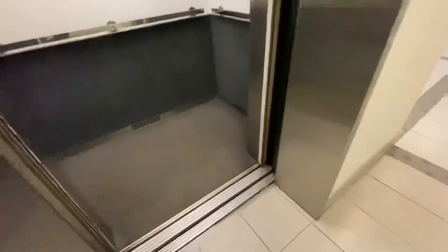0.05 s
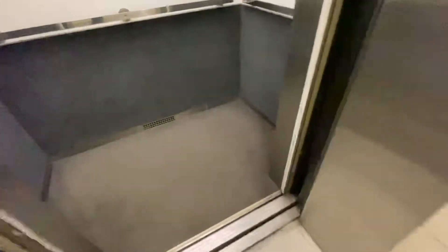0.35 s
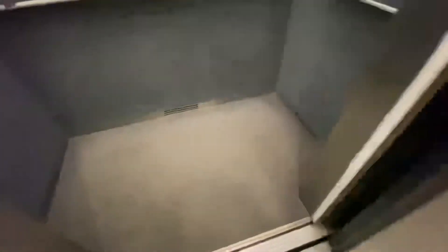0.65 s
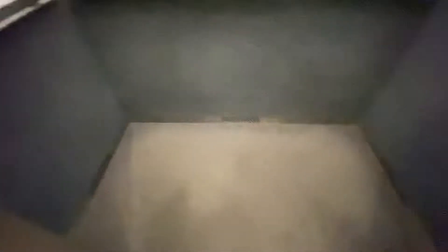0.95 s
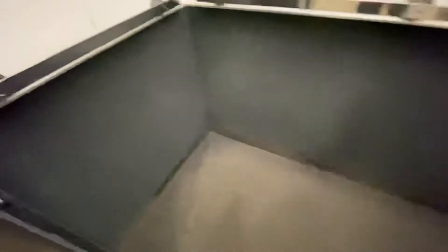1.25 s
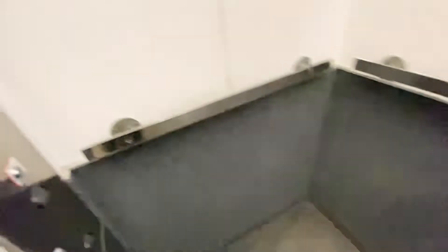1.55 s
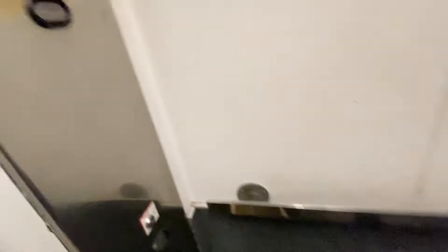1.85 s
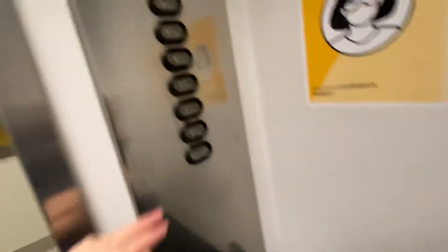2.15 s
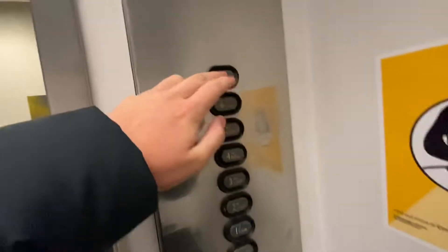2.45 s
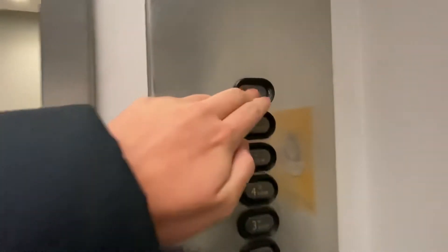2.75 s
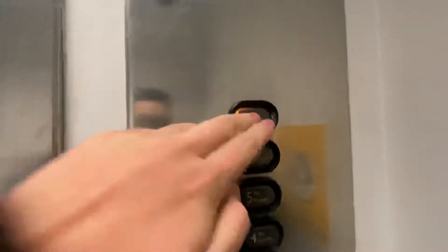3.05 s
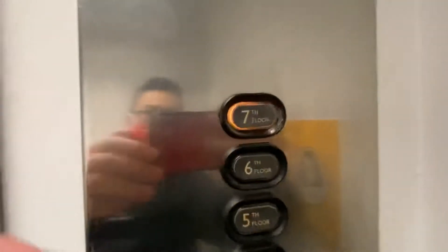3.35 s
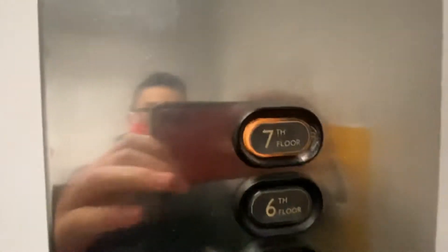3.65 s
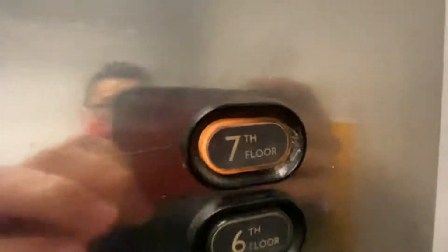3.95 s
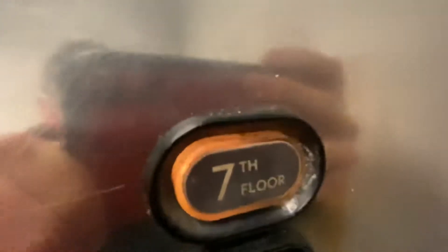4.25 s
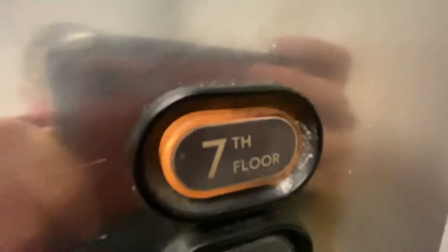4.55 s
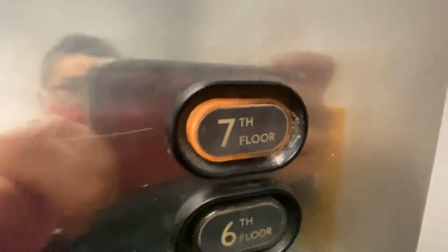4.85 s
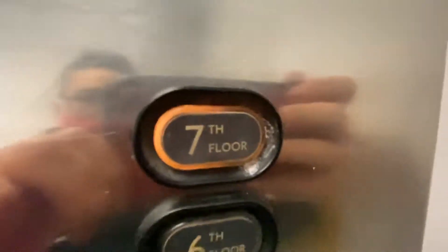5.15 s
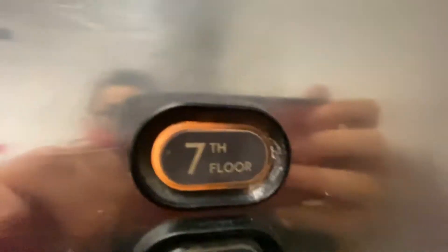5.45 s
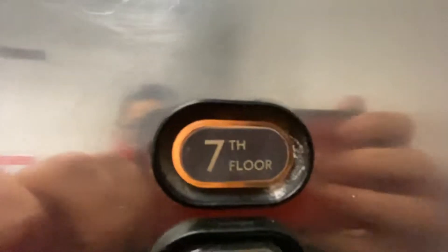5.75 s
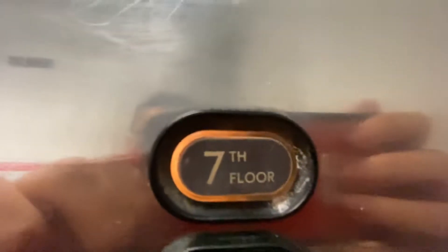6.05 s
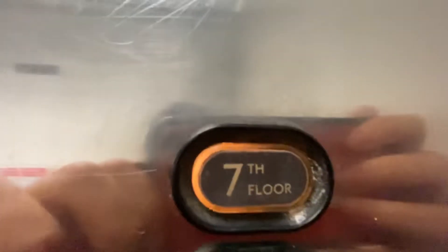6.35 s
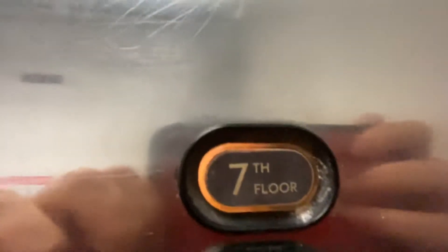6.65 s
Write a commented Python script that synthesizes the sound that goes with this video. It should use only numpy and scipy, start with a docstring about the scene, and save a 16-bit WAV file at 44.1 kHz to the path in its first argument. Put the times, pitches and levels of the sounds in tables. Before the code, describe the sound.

Footsteps enter a humming elevator, a button clicks twice, and steel doors rumble, clack and squeak shut with a heavy thud.

```python
"""Old steel lift doors closing

Someone steps into the hollow car over a machinery drone, coat rustling, and clicks a floor button twice.
The doors slide: their sheet steel rumbles and knocks, a dry roller chirps, hangers clack along the track
and a guide shoe squeals as they brake. The leaves latch and meet with a heavy thud; the drone remains.
Hits are decaying noise and ringing modes, squeaks are jittery friction tones, the rumble is shaped noise."""
import sys
import numpy as np
from scipy import signal
from scipy.fft import rfft, irfft, next_fast_len
from scipy.io import wavfile
from scipy.ndimage import map_coordinates

SR = 44100
rng = np.random.default_rng(int(sys.argv[2]) if len(sys.argv) > 2 else 0)


def materialize(psi):
    """Save the field psi as 16-bit PCM at rate SR to the path in sys.argv[1].

    A 1-D psi becomes a single channel; in a 2-D psi each row is a channel.
    """
    bounded = np.clip(np.atleast_2d(psi).T, -1, 1)
    quanta = np.round(bounded * 32767).astype(np.int16)
    wavfile.write(sys.argv[1], SR, quanta)


N = 300321
TIME = np.arange(N) / SR
AGE = TIME[:SR * 3 // 4]  # seconds since a hit
DOOR_LEAD_S = 0.000441  # the doors reach the left channel first

# Stereo width: f/Hz, left-right likeness
LIKENESS = [(60, 0.93), (300, 0.87), (550, 0.25), (2000, 0.064), (7000, 0.12), (12000, 0.091)]
# Keeps the bass centred: f/Hz, share of the stereo lead and of the wall reflections
SPREAD = [(450, 0.011), (620, 0.93)]
# Balance of the sliding doors: f/Hz, left minus right/dB
DOOR_PAN = [(60, -1), (200, -1), (380, -3.5), (800, 4.5), (1500, 0.5), (2400, -1.5), (4400, 1.5), (7500, 2),
            (10000, -7), (15000, 2.5)]
# Echo of the steel car: f/Hz, t60/s
CAR_DECAY = [(100, 0.26), (1000, 0.098), (5000, 0.17), (12000, 0.12)]

# Machinery in the shaft and moving air, fader curves: t/s, level/dB
DRONE_LEVEL = [(0.08, -44), (0.55, -53), (1.2, -68), (1.5, -43.5), (2.23, -50), (2.5, -40.5), (3.05, -41.5),
               (6.3, -34.5), (6.8, -37.5)]
DRAUGHT_LEVEL = [(0.02, -46), (0.2, -53.5), (0.45, -49.5), (0.95, -50), (1.15, -53), (1.5, -45.5),
                 (1.82, -50.5), (2.15, -47), (2.95, -49), (6.5, -47)]
# Their noise colours: f/Hz, level/dB
DRONE_EQ = [(17, -37), (33, 1.5), (54, 5.5), (102, 7.5), (117, 9.5), (135, -37), (170, -16), (220, -37),
            (370, -120)]
DRAUGHT_EQ = [(76, 4), (125, 2.5), (190, -7.5), (492, -19.5), (588, -7.5), (3000, -19.5), (5550, -27.5),
              (7050, -27.5), (10900, -38), (12100, -46), (13100, -75), (15000, -53)]
# A low hum that sags, then swells and rises: t/s, f/Hz, level/dB
MOTOR_HUM = [(0.0, 53.3, -61), (0.45, 47.5, -58), (0.6, 43.7, -66), (0.95, 45.3, -50), (1.3, 46.9, -43.5),
             (1.62, 51.2, -47), (1.82, 55, -42), (1.95, 55.9, -44)]

# Coat swishes: peak t/s, level/dB, half length/s
SWISHES = [(0.54, -54.5, 0.097), (0.923, -56, 0.02), (1.265, -59.5, 0.2), (1.458, -54.5, 0.022),
           (2.023, -53.5, 0.093), (2.252, -54.5, 0.12), (6.494, -53.5, 0.086), (6.685, -58, 0.18)]
# Shoes and hand bump the car: t/s, thump/dB, ring f/Hz, scuff/dB, scuff t60/s
STEPS = [(0.36, -52, 335, -47.5, 0.76), (0.915, -60, 172.5, -48, 0.23), (0.987, -46, 126, -55, 0.11),
         (1.32, -45.5, 352, -54, 0.4), (1.441, -29.5, 247, -62, 0.15), (1.54, -40.5, 252, -57, .25),
         (1.913, -39.5, 97.7, -54, 0.062), (2.372, -33, 214, -61, .1), (2.403, -30.5, 156.3, -57, 0.067),
         (2.511, -30, 181, -44.5, 0.061), (2.565, -32.5, 125, -55, 0.42), (6.44, -41.5, 535, -47.5, 0.46)]
# Dry ticks of shoes, a finger on the panel and the door track: t/s, level/dB, centre f/Hz, t60/s
TICKS = [(0.827, -49, 1690, .04), (0.986, -44, 950, .05), (1.002, -41.5, 610, 0.1),
         (1.433, -40.5, 3350, .08), (2.403, -43, 1020, 0.12), (2.404, -42.5, 7600, 0.086),
         (2.421, -38, 590, .07), (3.418, -32, 1290, 0.018), (3.568, -28, 1050, 0.017),
         (3.592, -31, 1090, 0.016)]
# Colours of cloth, thump and scuff: f/Hz, level/dB
CLOTH_EQ = [(1000, -34), (3000, -4), (5500, -5), (7300, -0.5), (9500, -9), (12000, -13.5), (15000, -27)]
THUMP_EQ = [(40, -41), (100, 2), (250, 1.5), (450, -11), (1000, -21), (2000, -36), (5000, -129)]
SCUFF_EQ = [(200, -8), (900, 11.5), (2200, 8), (3300, 2.5), (4300, 0), (7000, -5), (10000, -14),
            (12000, -25), (15000, -40)]

# Button contacts, levels relative within each layer: t/s, click/dB, snap/dB, panel knock/dB
BUTTON_HITS = [(2.647, -27, -32, -44), (2.665, -20.5, -17, -32), (2.688, -46, -52, -25.5),
               (2.714, -42, -54, -24.5), (3.059, -30.5, -38, -47), (3.0727, -24.5, -8, -38)]
# Colours of the housing's click and the spring's snap: f/Hz, level/dB
CLICK_EQ = [(200, 9), (900, 12), (1800, 2), (2700, 2.5), (3800, -4.5), (5500, -4), (7200, 3), (9000, -7),
            (11300, -13), (13000, -24), (16000, -29)]
SNAP_EQ = [(500, -23), (2500, -1.5), (4400, -5), (7500, 0.5), (11000, 2.5), (13000, -11), (16000, -7)]
# Ring of the button panel: f/Hz, level/dB, t60/s
PANEL_MODES = [(109.6, 0.5, 0.42), (177, 1, 0.22), (209.6, 4.5, 0.37), (300, -7, 0.28), (410, -13, 0.21),
               (654, -14, 0.32), (708, -10, 0.23), (973, -0.5, .18), (998, -1.5, 0.16), (1430, -15, 0.18),
               (6940, -25, 0.6)]

# The doors creep, run, brake and ease shut; the end values hold as a faint rumble: t/s, share of full speed
DOOR_SPEED = [(3.05, 0.16), (3.12, 0.34), (3.5, 0.52), (3.75, 0.42), (4.099, 0.49), (4.3, 0.92), (4.75, 1),
              (5.17, 0.73), (5.441, 0.56), (5.57, 0.27), (5.8, 0.5), (6.1, 0.52), (6.2, 0.27), (6.6, 0.21)]
# The drive and its stops jolt the leaves: t/s, sway/dB, sheet/dB
JOLTS = [(3.08, -46, -33.5), (3.249, -27, -32.5), (3.432, -24, -24.5), (3.88, -41, -30), (4.22, -27.5, -34),
         (4.715, -22.5, -27.5), (4.97, -19, -28), (5.08, -21.5, -27.5), (5.37, -24.5, -27),
         (5.46, -25, -28), (5.71, -30, -25.5), (5.772, -39, -19.5), (5.87, -29, -23.5), (5.95, -23.5, -45),
         (6.01, -36, -23), (6.08, -33, -26), (6.24, -30.5, -52)]
# Colours of swaying leaves, drumming sheet, rollers and struck steel: f/Hz, level/dB
SWAY_EQ = [(12, -51), (20, -27.5), (86, -5.5), (170, -18), (220, -65), (370, -120)]
SHEET_EQ = [(71, -48), (120, 1.5), (285, -3.5), (471, -6.5), (549, -14.5), (696, -17), (891, -27.5),
            (1030, -24), (1400, -31), (1820, -40), (3080, -120)]
ROLLER_EQ = [(470, -15), (780, 0), (1090, -3), (1910, -7.5), (2630, -7), (3440, -11), (6680, -15.5),
             (9650, -22.5), (11200, -30), (12300, -36), (13100, -77), (14500, -38)]
STEEL_EQ = [(200, -2), (600, 0.5), (1200, -1.5), (2200, 2.5), (2900, 1), (3800, -5), (4800, -2),
            (5700, -10), (6900, -4.5), (8500, -14), (10300, -17.5), (12000, -28.5), (13000, -40),
            (15500, -34)]
# Hangers and latch strike: t/s, level/dB, rise/s, treble tilt/(dB per octave)
CLACKS = [(3.242, -40, 0.0015, -1.5), (3.443, -36.5, .004, 5), (3.467, -32, 0.0036, -2.5),
          (3.690, -36.5, .002, 4.5), (3.783, -36, 0.00098, -0.5), (3.855, -31.5, 0.0018, 1),
          (4.12, -38.5, 0.0098, 2), (4.203, -28, 0.0028, 0.5), (4.301, -29.5, 0.00086, 2),
          (4.366, -33, 0.0037, 6.5), (4.385, -29.5, 0.00095, 1.5), (4.446, -36.5, .002, 0.5),
          (4.474, -25, 0.0047, 0.5), (4.593, -21.5, 0.0015, 2), (4.622, -29, 0.0034, -4.5),
          (4.765, -27, 0.001, 3), (4.836, -30.5, 0.012, -2.5), (4.967, -33, 0.0022, -2),
          (5.021, -38, .003, 8.5), (5.377, -28.5, 0.0018, -11), (5.455, -34, 0.0018, -4.5),
          (5.664, -33.5, 0.0033, -1), (5.689, -32, 0.0089, 4), (5.778, -26.5, 0.0027, -8),
          (5.864, -21, 0.0062, -1), (6.001, -32.5, 0.0049, 2.5), (6.015, -27, 0.0049, 0),
          (6.055, -27.5, 0.02, -1.5)]
# Pushes on the loose door skins: t/s, level/dB, centre f/Hz
KNOCKS = [(3.593, -19.5, 300), (4.219, -9.5, 327), (4.39, -15.5, 308), (4.45, -8, 476), (4.606, -8, 423),
          (4.808, -7.5, 282), (5.067, -14.5, 650), (5.268, -16, 273), (5.385, -19, 750), (5.43, -11, 700),
          (5.673, -14, 223), (5.777, -18, 456), (5.82, -8.5, 600), (5.92, -14.5, 326), (6.247, -25, 263)]
# Resonances of the door skins, and of door steel and track: f/Hz, width/Hz, level/dB
SKIN_MODES = [(218, 14, -0.5), (273, 8.1, 0), (297, 24, 3), (347, 15, -4.5), (413, 10, 0.5),
              (479.6, 22, -1.5), (604, 22, 0.5), (715, 27, -1.5), (798, 30, -0.5)]
TRACK_MODES = [(605, 30, -6.5), (853, 305, -11.5), (1287, 21, -7), (1866, 23, -1.5), (2045, 26, -4),
               (2636, 26, -4.5), (2800, 41, -6), (6600, 480, -5.5), (10060, 140, -5)]

# A dry roller sticks once a turn: t/s, level/dB, f/Hz, length/s
CHIRPS = [(3.175, -26, 935, 0.02), (3.329, -24, 923, 0.0086), (3.463, -24, 920, 0.0087),
          (3.628, -23.5, 915, 0.011), (3.985, -20.5, 907, 0.0088)]
# The guide shoe rasps before its squeal catches: t/s, level/dB
RASP_LEVEL = [(5.135, -59), (5.17, -41), (5.21, -42), (5.27, -46), (5.295, -48)]
# The rasp's narrow band: f/Hz, level/dB
RASP_EQ = [(3200, -42), (3530, -3), (3760, 3), (4020, -9), (4350, -41)]
# The guide shoe loses and finds its grip, then the door arm squeaks: t/s, f/Hz, level/dB
SHOE_SQUEAL = [(5.195, 3955, -50), (5.224, 3885, -33), (5.238, 3878, -35), (5.255, 3865, -28),
               (5.29, 3835, -36), (5.308, 3800, -56), (5.335, 3830, -36.5), (5.354, 3860, -52),
               (5.395, 3814, -45)]
ARM_SQUEAK = [(5.585, 1378, -58), (5.607, 1360, -43), (5.635, 1330, -34.5), (5.66, 1315, -43),
              (5.68, 1305, -57)]
# A thin whine after the doors shut: t/s, f/Hz, level/dB
WHINE = [(6.41, 9640, -72), (6.44, 9800, -61), (6.49, 9560, -67), (6.56, 9800, -87)]
# Overtones of roller, guide shoe and arm: harmonic number, level/dB
ROLLER_TONE = [(1, 9), (2, -5.5), (3, -1.5), (4, -0.5), (7, -7), (8, -7), (11, -10)]
SHOE_TONE = [(1, 7), (2, -9)]
ARM_TONE = [(1, 3), (2, 2.5), (3, -10), (4, -15), (5, -7)]

# The leaves meet: t/s, level/dB
THUDS = [(5.829, -29), (5.957, -29.5), (6.015, -25), (6.061, -27), (6.095, -30)]
# Boom of a door leaf: f/Hz, level/dB, t60/s
LEAF_MODES = [(87, 10, 0.23), (186.4, -4, 0.19), (273, 1, 0.5), (407, -9, 0.14)]


def amp(db):
    """Decibels to gain."""
    return 10 ** (np.asarray(db) / 20)


def unit(x):
    """Scale to rms 1."""
    return x / np.sqrt(np.mean(x ** 2) + 1e-20)


def along(points, hz):
    """Read an (f/Hz, value) curve on a log frequency axis."""
    f, values = np.transpose(points)
    return np.interp(np.log(hz + 1), np.log(f + 1), values)


def curves(rows):
    """One automation curve for each column after the time."""
    times, *columns = np.transpose(rows)
    return [np.interp(TIME, times, column) for column in columns]


def gate(rows, fade_s):
    """1 while a table lasts, fading out beyond its ends."""
    outside_s = np.maximum(rows[0][0] - TIME, TIME - rows[-1][0])
    return np.exp(-np.maximum(0, outside_s) / fade_s)


def wobble(rate, size=N):
    """A smooth random curve, rate knots a second."""
    knots = rng.standard_normal(int(size * rate / SR) + 4)
    return map_coordinates(knots, [np.arange(size) * rate / SR])


def filtered(x, response):
    """Filter x by a complex response of frequency."""
    size = x.shape[-1]
    padded = next_fast_len(size + 8192)
    return irfft(rfft(x, padded) * response(np.fft.rfftfreq(padded, 1 / SR)), padded)[..., :size]


def resonances(modes, hz):
    """Complex response of a bank of band-pass resonators."""
    return sum(amp(db) * 1j * hz * width / (centre ** 2 - hz ** 2 + 1j * hz * width)
               for centre, width, db in modes)


def add(track, s, sound):
    """Mix a sound in at s seconds."""
    part = track[..., round(s * SR):][..., :sound.shape[-1]]
    part += sound[..., :part.shape[-1]]


def time_pan(x, lead_s):
    """Left runs ahead of right by nearly lead_s; the bass arrives together."""
    sides = np.array([[1], [-1]])
    return filtered(x, lambda hz: np.exp(1j * np.pi * hz * lead_s * along(SPREAD, hz) * sides))


def noise(eq, size=N, lead_s=DOOR_LEAD_S, tilt_db=0):
    """Stereo noise of rms 1, part direct, part diffuse; tilt_db is per octave above 500 Hz."""
    def mid_side(hz):
        width = np.arccos(np.clip(along(LIKENESS, hz), 0, 1)) / 2
        colour = amp(along(eq, hz) + tilt_db * np.log2(np.maximum(hz, 500)))
        return colour * [np.cos(width), np.sin(width)]
    mid, side = filtered(rng.standard_normal((2, size)), mid_side)
    return unit(time_pan(np.array([mid + side, mid - side]), lead_s))


def strike(t60, rise):
    """Envelope of a hit, peak 1; times in seconds."""
    shape = amp(-60 * AGE / t60) * (1 - np.exp(-AGE / rise))
    return shape / shape.max()


def ring(modes, rise, blur):
    """Decaying modes, a little different at each hit; phase drift smears the higher ones most."""
    out = np.zeros(len(AGE))
    for hz, db, t60 in modes:
        drift = blur * (1 + hz / 5000) * wobble(60 + hz / 30, len(AGE))
        out += amp(db + rng.normal(0, 0.88)) * strike(t60, rise) * np.sin(2 * np.pi * hz * AGE + drift)
    return out


def rough_tone(pitch_hz, overtones, jitter):
    """Harmonic tone of rms 1 whose period scatters, as in stick-slip friction."""
    unsteady_hz = pitch_hz * (1 + jitter * wobble(400, len(pitch_hz)))
    phase = 2 * np.pi * np.cumsum(unsteady_hz) / SR
    return unit(sum(amp(db) * np.sin(round(k) * phase + rng.uniform(0, 2 * np.pi))
                    for k, db in overtones))


def in_car(x, wet_db, lead_s):
    """Panned direct sound plus the short echo of the steel walls."""
    white = noise([(100, 0), (10000, 0)], size=SR // 2, lead_s=0)
    hz, t, bands = signal.stft(white, SR, nperseg=256)
    decay = amp(-60 * t / along(CAR_DECAY, hz)[:, None])
    tail = signal.istft(bands * decay, SR, nperseg=256)[1]
    echo = signal.fftconvolve(x[None], tail / np.linalg.norm(tail[0]), axes=1)[:, :N]
    return time_pan(x, lead_s) + amp(wet_db) * echo


def near_walls(x, strength, count=10):
    """Weak early reflections comb each channel in its own way; the bass passes almost untouched."""
    copies = np.zeros_like(x)
    for channel in range(2):
        for delay, sign in zip(rng.uniform(.001, .014, count), rng.choice([-1, 1], count)):
            add(copies[channel], delay, strength * sign * x[channel])
    return x + filtered(copies, lambda hz: along(SPREAD, hz))


def room_tone():
    """Machinery drones in the shaft and air moves in the lobby."""
    drone = amp(curves(DRONE_LEVEL)[0]) * noise(DRONE_EQ, lead_s=0)
    draught = amp(curves(DRAUGHT_LEVEL)[0]) * noise(DRAUGHT_EQ, lead_s=0)
    return drone + draught


def motor():
    """A low, nearly pure hum from the shaft."""
    hz, db = curves(MOTOR_HUM)
    swell = amp(db + wobble(5.3)) * gate(MOTOR_HUM, fade_s=0.042)
    return swell * rough_tone(hz, [(1, 15), (2, -42)], jitter=0.022)


def coat():
    """Each move swells and fades as a swish of grainy cloth."""
    motion = amp(-71)  # rustle between moves
    for s, db, half_length in SWISHES:
        width = half_length * np.where(TIME < s, 0.76, 1.14)  # quicker in than out
        swish = amp(db) * np.exp(-.5 * ((TIME - s) / width) ** 2)
        motion = np.hypot(motion, swish)
    return motion * amp(1.1 * wobble(70)) * noise(CLOTH_EQ, lead_s=0)


def steps():
    """Soft thumps boom in the hollow car, each with a scuff of sole or hand; higher rings die sooner."""
    out = np.zeros((2, N))
    for s, db, ring_hz, scuff_db, scuff_t60 in STEPS:
        thump = 0.73 * strike(t60=0.3, rise=0.0024) * noise(THUMP_EQ, len(AGE))
        boom = ring([(ring_hz, 0, 4 / np.sqrt(ring_hz))], rise=0.0013, blur=1.02)
        scuff = strike(scuff_t60, rise=0.0041) * noise(SCUFF_EQ, len(AGE))
        add(out, s, amp(db) * (thump + boom) + amp(scuff_db) * scuff)
    return out


def ticks():
    """Dry ticks of shoes, a finger on the panel and the door track: light contacts that hardly ring."""
    out = np.zeros((2, N))
    for s, db, centre, t60 in TICKS:
        band = [(centre, 0.39 * centre, 0)]
        body = filtered(noise(SCUFF_EQ, len(AGE)), lambda hz: resonances(band, hz) ** 2)
        add(out, s, amp(db) * strike(t60, rise=0.00094) * unit(body))
    return out


def button():
    """The spring snaps, the housing rattles and the steel panel clunks and rings behind it."""
    housing, snaps, panel = np.zeros((2, N)), np.zeros(N), np.zeros(N)
    for s, click_db, snap_db, knock_db in BUTTON_HITS:
        click = strike(t60=0.18, rise=0.0007) * noise(CLICK_EQ, len(AGE), lead_s=0.0007)
        clunk = strike(t60=0.13, rise=0.015) * noise(SHEET_EQ, len(AGE), tilt_db=5)
        add(housing, s, amp(click_db) * click + amp(knock_db - 6) * clunk)
        add(snaps, s, amp(snap_db) * strike(t60=0.01, rise=0.00029) * noise(SNAP_EQ, len(AGE))[0])
        add(panel, s, amp(knock_db - 3.5) * ring(PANEL_MODES, rise=0.0034, blur=0.74))
    return housing + in_car(snaps, wet_db=-1, lead_s=0.00076) + in_car(panel, wet_db=-4, lead_s=0.00042)


def crackle(speed, full_speed_per_s=24, hardest_db=-29.5, count=200):
    """Specks of grit snap under the rollers, more often and harder at speed."""
    energy = np.zeros(N)
    snap = strike(t60=0.018, rise=0.0003)
    start, end = DOOR_SPEED[0][0], DOOR_SPEED[-1][0]
    for when, chance, size in rng.uniform(size=(count, 3)):
        s = start + when * (end - start)
        pace = np.interp(s, TIME, speed)
        if chance < pace * full_speed_per_s * (end - start) / count:
            add(energy, s, (pace * size ** 2 * amp(hardest_db) * snap) ** 2)
    return np.sqrt(energy) * noise(STEEL_EQ)


def rumble(sway_db=-28.5, sheet_db=-26, roll_db=-35.2):
    """Speed and jolts sway the leaves and drum their sheet steel; grit roughens the rolling."""
    speed = curves(DOOR_SPEED)[0]
    sway_energy = (amp(sway_db) * speed ** 1.6) ** 2
    sheet_energy = (amp(sheet_db) * speed ** 1.51) ** 2
    shake = strike(t60=0.71, rise=0.0048)
    for s, jolt_sway_db, jolt_sheet_db in JOLTS:
        add(sway_energy, s, (amp(jolt_sway_db) * shake) ** 2)
        add(sheet_energy, s, (amp(jolt_sheet_db) * shake) ** 2)
    bumps = wobble(45)
    sway = np.sqrt(sway_energy) * noise(SWAY_EQ)
    sheet = np.sqrt(sheet_energy) * amp(0.82 * bumps) * noise(SHEET_EQ)
    grit = unit(amp(0.4 * wobble(360) + 2.7 * bumps))
    rolling = amp(roll_db) * speed ** 1.44 * grit * noise(ROLLER_EQ)
    return sway + sheet + rolling + crackle(speed)


def clacks():
    """Loose hangers and the latch: a crack of contact, two rebounds and a chatter of dense steel."""
    out = np.zeros((2, N))
    grid_hz = np.geomspace(200, 15500, 110)
    for s, db, rise, tilt_db in CLACKS:
        t60 = 0.26 * 2 ** (-tilt_db / 22)  # bright contacts settle sooner
        colour_db = rng.normal(0, 3, len(grid_hz))  # each contact point favours other modes
        eq = np.column_stack([grid_hz, along(STEEL_EQ, grid_hz) + colour_db])
        chatter = unit(amp(3.2 * wobble(450, len(AGE))))
        cracks = 0.34 * strike(t60=0.033, rise=rise / 3)
        for rebound_s in rng.uniform(.004, .022, size=2):
            add(cracks, rebound_s, .55 * strike(t60=.014, rise=.0003))
        envelope = 0.87 * strike(t60, rise) * chatter + cracks
        add(out, s, amp(db) * envelope * noise(eq, len(AGE), tilt_db=tilt_db))
    return out


def knocks():
    """Each bump is one short push on the door skin; shorter ones reach its higher modes."""
    pushes = np.zeros(N)
    for s, db, hz in KNOCKS:
        pulse_time = np.sqrt(2) * np.pi * hz * AGE - 3  # puts the pulse's spectral peak at hz
        add(pushes, s, amp(db) * pulse_time * np.exp(1 - pulse_time ** 2))
    # neighbouring modes swing in opposite polarity
    skin = filtered(pushes, lambda hz: resonances(SKIN_MODES[::2], hz) - resonances(SKIN_MODES[1::2], hz))
    return in_car(skin, wet_db=-5.5, lead_s=DOOR_LEAD_S)


def squeal(rows, overtones, jitter, flutter_db):
    """A gliding friction tone whose grip flutters."""
    hz, db = curves(rows)
    flutter = unit(amp(flutter_db * wobble(130)))
    return amp(db) * gate(rows, fade_s=.01) * flutter * rough_tone(hz, overtones, jitter)


def squeaks():
    """The dry roller chirps as the doors start; shoe and arm squeal as they slow; a thin whine follows."""
    chirps = np.zeros(N)
    for s, db, hz, length in CHIRPS:
        grip = (1 - np.exp(-AGE / .0012)) * np.exp(-(AGE / length) ** 4)
        tone = rough_tone(np.full(len(AGE), hz), ROLLER_TONE, jitter=.034)
        grit = .65 * noise(CLICK_EQ, len(AGE), tilt_db=2.5)[0]
        add(chirps, s, amp(db) * grip * (tone + grit))
    rasp_level = amp(curves(RASP_LEVEL)[0]) * gate(RASP_LEVEL, fade_s=0.0092)
    rasp = rasp_level * unit(amp(1.5 * wobble(200))) * noise(RASP_EQ)
    shoe = squeal(SHOE_SQUEAL, SHOE_TONE, jitter=0.005, flutter_db=1.5)
    arm = squeal(ARM_SQUEAK, ARM_TONE, jitter=0.01, flutter_db=1.5)
    whine = squeal(WHINE, [(1, 0)], jitter=0.015, flutter_db=3)
    squeals = in_car(shoe + arm + whine, wet_db=-7, lead_s=.0002)
    return in_car(chirps, wet_db=-4.5, lead_s=0.000391) + squeals + rasp


def thuds():
    """The heavy leaves meet and boom in their lowest modes."""
    out = np.zeros(N)
    for s, db in THUDS:
        add(out, s, amp(db) * ring(LEAF_MODES, rise=0.0044, blur=0.53))
    return in_car(out, wet_db=-13.5, lead_s=DOOR_LEAD_S)


def sliding_doors():
    """Rumble, clacks and knocks ring through the door steel and track, then bounce off the walls."""
    def steel(hz):
        balance = amp(along(DOOR_PAN, hz) * np.array([[.5], [-.5]]))
        return (1 + resonances(TRACK_MODES, hz)) * balance
    return near_walls(filtered(rumble() + clacks() + knocks(), steel), strength=0.16)


def scene():
    """The full mix, heard from beside the button panel."""
    bed_and_foley = room_tone() + coat() + motor() + steps() + ticks() + button()
    return bed_and_foley + sliding_doors() + squeaks() + thuds()


def record(dry):
    """A soft clipper rounds the sharpest peaks and a steep low-pass trims the top."""
    ceiling, top_hz = .85, 16000
    rounded = dry / (1 + (dry / ceiling) ** 4) ** (1 / 4)
    return filtered(rounded, lambda hz: 1 / (1 + (hz / top_hz) ** 80))


dry = scene()
out = record(dry)
materialize(out)
```